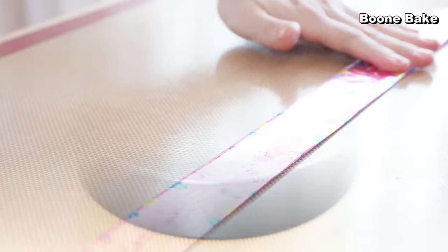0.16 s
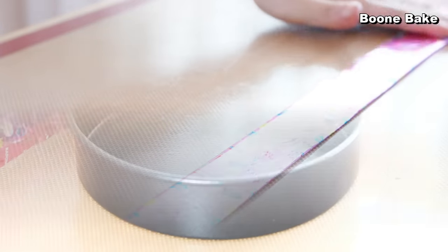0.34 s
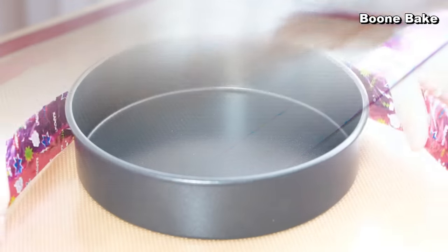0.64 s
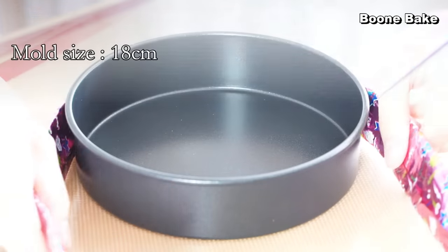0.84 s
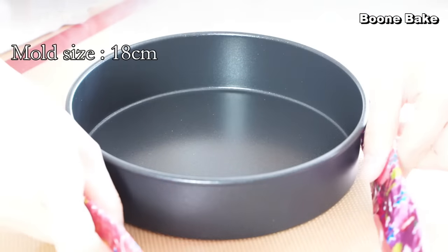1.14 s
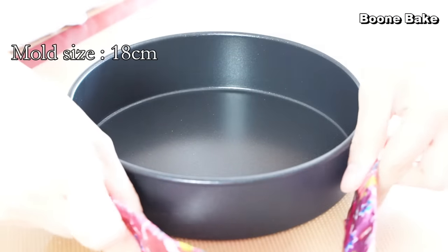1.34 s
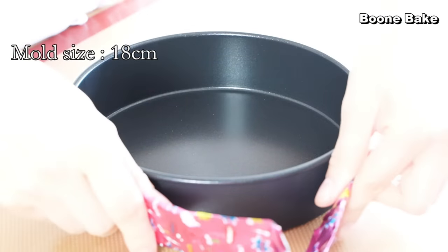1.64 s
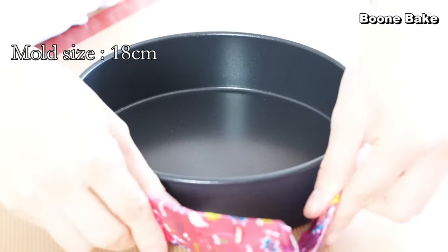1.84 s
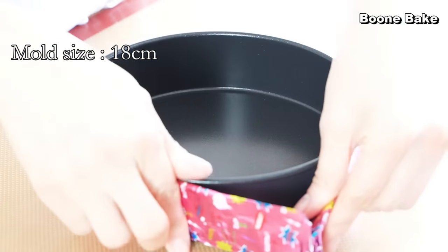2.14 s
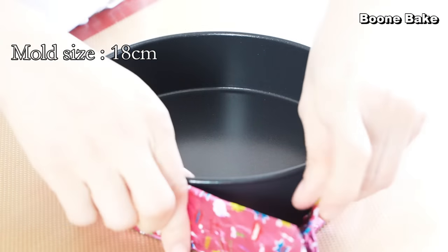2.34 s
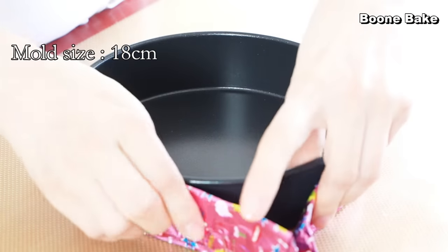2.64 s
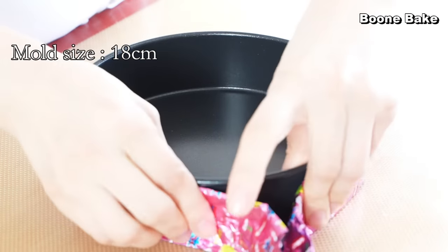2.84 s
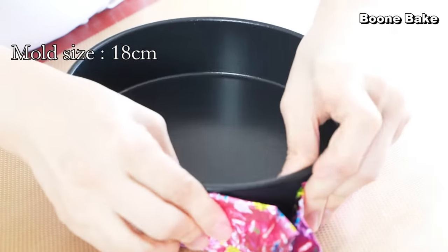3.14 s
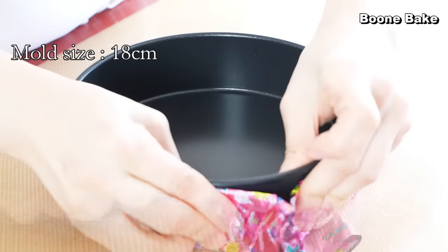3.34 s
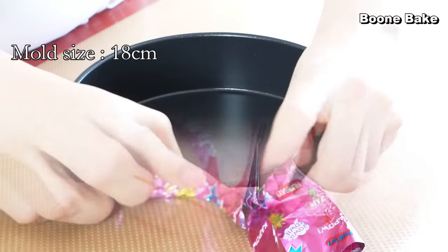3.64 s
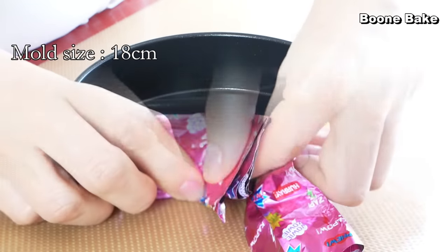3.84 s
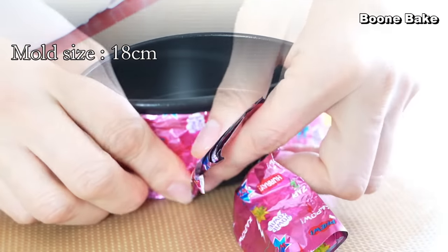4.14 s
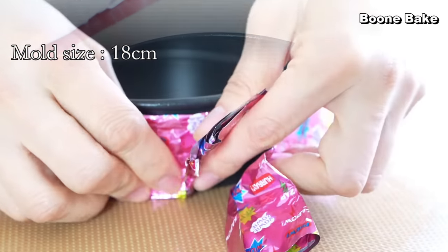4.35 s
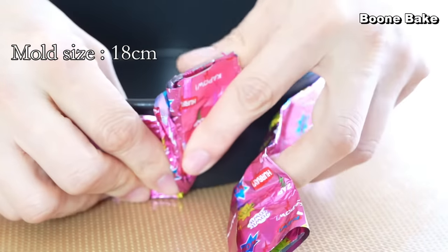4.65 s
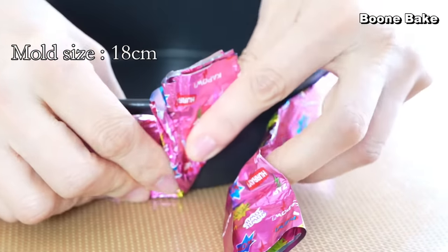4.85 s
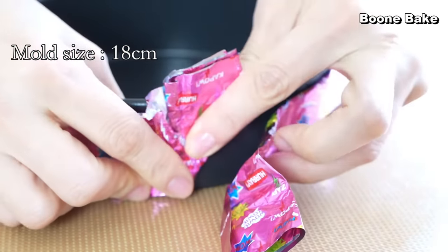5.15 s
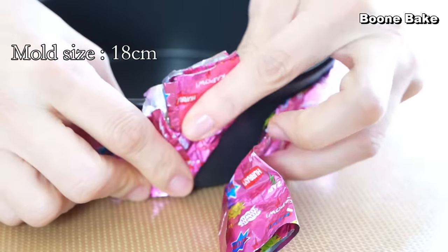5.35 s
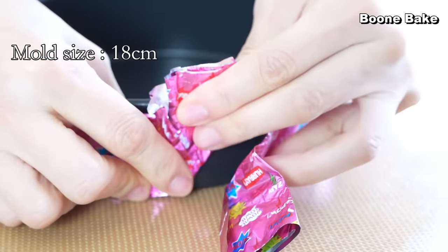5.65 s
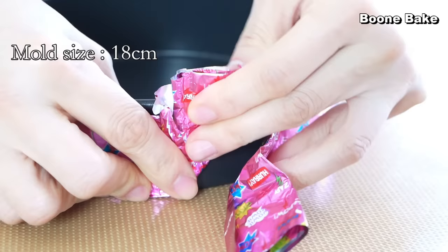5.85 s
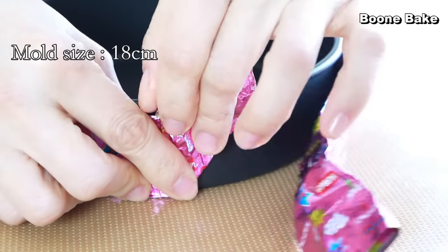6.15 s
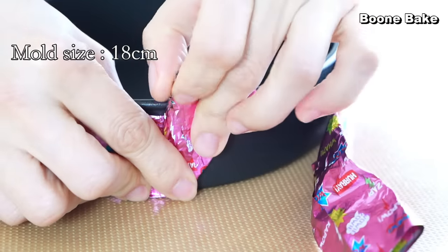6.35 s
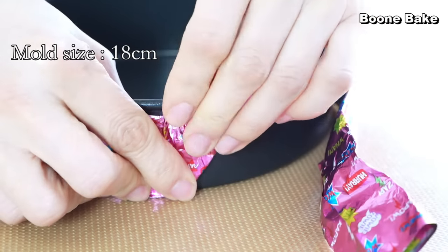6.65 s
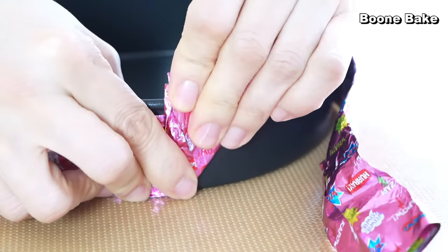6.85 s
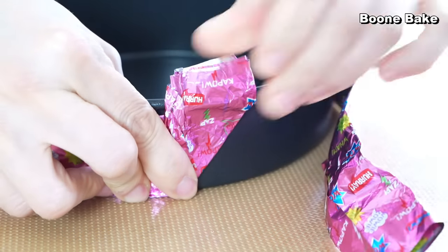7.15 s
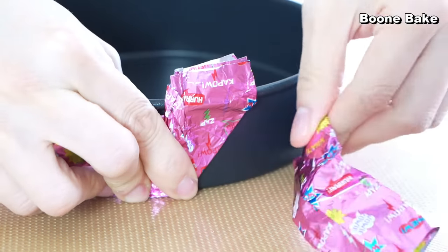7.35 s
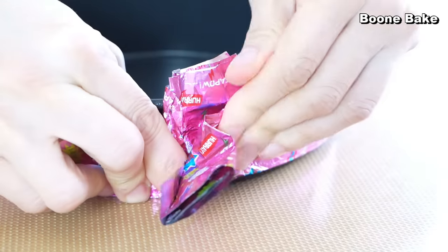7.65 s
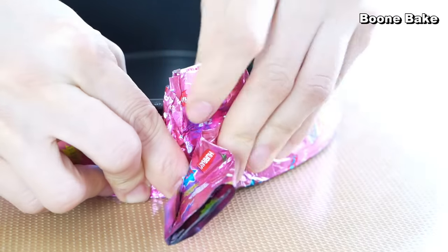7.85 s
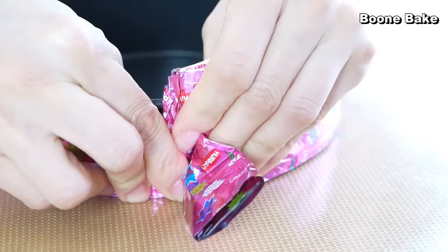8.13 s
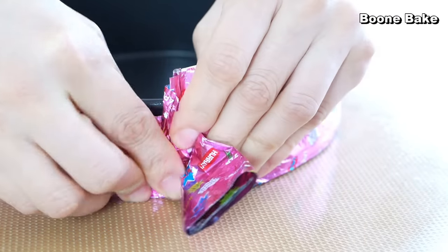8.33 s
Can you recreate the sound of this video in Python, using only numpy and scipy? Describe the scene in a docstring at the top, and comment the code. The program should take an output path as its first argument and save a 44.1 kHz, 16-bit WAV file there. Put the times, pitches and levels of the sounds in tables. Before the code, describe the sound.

Crisp foil handling heard near the microphone: a loud sliding crackle at first, a quieter stretch, then lively creasing and popping as the strip is pulled tight. Quieter pressing and folding ticks follow, with soft thuds on table and pan, a sharp tap around six seconds and bright scraping bursts after seven. Short room reflections and faint low room tone.

```python
"""Metallised foil is smoothed on a table, drawn round a steel baking pan and folded: dense random facet pops over hiss.
Creases tick and panels pop as short noise cracks ringing panel, crease and edge resonances.
Swaying low tones make a deep rumble under the moving arms, and dull noise makes the fingers' rub.
Bumps on pan and table are resonant noise thuds with decaying sine modes for the pan.
A small room answers with a short diffuse tail, over a quiet room tone."""
import sys
import numpy as np
from scipy import signal
from scipy.fft import rfft, irfft, next_fast_len
from scipy.io import wavfile
from scipy.ndimage import uniform_filter1d, map_coordinates

SR = 44100
rng = np.random.default_rng(int(sys.argv[2]) if len(sys.argv) > 2 else 0)


def master_out(mix):
    """Clip the mix to full scale and print it as 16-bit PCM to the path in sys.argv[1]."""
    frames = np.transpose(np.atleast_2d(mix))
    ceiling = np.clip(frames, -1, 1)
    pcm = np.round(ceiling * 32767).astype(np.int16)
    wavfile.write(sys.argv[1], SR, pcm)


N = 374409  # length in samples, about 8.5 s


def amp(db):
    """Decibels to gain."""
    return 10 ** (np.asarray(db) / 20)


def unit(x):
    """Scale to rms 1."""
    return x / np.sqrt(np.mean(x ** 2) + 1e-20)


def along(points, hz):
    """Read (Hz, value) points on a log frequency axis."""
    f, v = np.transpose(points)
    return np.interp(np.log(hz + 1), np.log(f + 1), v)


def curve(rows):
    """Turn (seconds, value) rows into one value per sample."""
    return np.interp(np.arange(N) / SR, *np.transpose(rows))


def wobble(rate):
    """A smooth random curve with rate knots a second."""
    knots = rng.standard_normal(int(N * rate / SR) + 4)
    return map_coordinates(knots, [np.arange(N) * rate / SR])


def add(track, s, sound):
    """Mix a sound into the track at time s in seconds."""
    part = track[max(round(s * SR), 0):][:len(sound)]
    part += sound[:len(part)]


def filtered(x, response):
    """Filter x by a complex response of frequency."""
    m = next_fast_len(len(x) + min(len(x), SR // 2))
    return irfft(rfft(x, m) * response(np.fft.rfftfreq(m, 1 / SR)), m)[:len(x)]


def resonate(x, modes):
    """Pass x through parallel (Hz, width Hz, dB) resonances of alternating sign."""
    def response(f):
        total = 0
        for k, (centre, width, db) in enumerate(modes):
            damping = 1j * f * width
            total = total + (-1) ** k * amp(db) * damping / (centre ** 2 - f * f + damping)
        return total
    return filtered(x, response)


def coloured(x, points, size=1024):
    """Filter x causally to a (Hz, dB) shape, with a minimum-phase kernel of unit energy."""
    shape_db = np.maximum(along(points, np.fft.rfftfreq(size, 1 / SR)), -60)
    cepstrum = irfft(np.log(amp(shape_db)))
    # fold the cepstrum forward in time
    cepstrum[1:size // 2] *= 2
    cepstrum[size // 2 + 1:] = 0
    kernel = irfft(np.exp(rfft(cepstrum)))
    return signal.oaconvolve(x, kernel / np.linalg.norm(kernel))[:N]


def noise(points):
    """Noise of rms 1 with a (Hz, dB) shape."""
    return unit(filtered(rng.standard_normal(N), lambda hz: amp(along(points, hz))))


def burst(t60, size):
    """White noise that starts at full level and falls 60 dB in t60 seconds."""
    return rng.standard_normal(size) * amp(-60 * np.arange(size) / SR / t60)


def swells(rows, attack_s, release_s, size=44100):
    """Gain of (seconds, length, dB) gestures: each grows, holds and dies away; their powers add."""
    power, t = np.zeros(N), np.arange(size) / SR - .2
    for s, length, db in rows:
        away = np.maximum(-t, 0) / attack_s + np.maximum(t - length, 0) / release_s
        add(power, s + t[0], (amp(db) * np.exp(-away)) ** 2)
    return np.sqrt(power)


def crackle(rate, spread_db, slide_db, facet_t60, tone_db=-3, flutter_db=-15, flutter_t60=0.074, count=24):
    """Facets buckle at random moments and strengths, each with its own tiny ring, over the hiss of sliding."""
    pops, t = np.zeros(N), np.arange(256) / SR
    for hz in np.linspace(2200, 14500, count):
        at = rng.integers(0, N, int(rate / count * N / SR))
        strengths_db = spread_db * np.minimum(rng.exponential(size=len(at)), 3.3)
        kicks = np.bincount(at, amp(strengths_db), N)
        ring = np.sin(2 * np.pi * hz * t) * amp(-60 * t / facet_t60)
        crack = burst(facet_t60, len(t)) + amp(flutter_db) * burst(flutter_t60, len(t))
        facet = unit(unit(crack) + amp(tone_db) * unit(ring))
        pops += signal.oaconvolve(kicks, facet)[:N]
    pops = unit(pops) + amp(slide_db) * rng.standard_normal(N)
    # even out the local loudness, so that the gesture levels set it
    power = uniform_filter1d(uniform_filter1d(pops ** 2, size=1400), size=900)
    return pops / np.sqrt(np.abs(power) + 1e-9)


# Colour of tightly folded foil. Each row: frequency in Hz, gain in dB.
FOLDED_COLOUR = [(120, -27), (200, -0.5), (340, -10.5), (480, -5.5), (1080, -4), (3190, -2.5),
                 (11100, -1.5), (13600, 0.5), (16000, -11.5)]


def flexed(grain, rows, attack_s, release_s, body_hz=3200):
    """Tight foil crackles under each gesture; a broad piece has more body than a narrow one."""
    foil = coloured(grain, FOLDED_COLOUR)
    body = filtered(foil, lambda hz: 1 / (1 + (hz / body_hz) ** 4))
    top_rows = [(s, length, db) for s, length, db, breadth in rows]
    body_rows = [(s, length, db + breadth) for s, length, db, breadth in rows]
    top_gain = swells(top_rows, attack_s, release_s)
    body_gain = swells(body_rows, attack_s, release_s)
    return top_gain * (foil - body) + body_gain * body


# Colours of foil lying flat and drawn round the pan. Each row: frequency in Hz, gain in dB.
FLAT_COLOUR = [(120, -17), (200, -27), (440, -13), (600, -10.5), (2960, -6.5), (6760, 1.5), (14100, -7),
               (16000, -17)]
DRAWN_COLOUR = [(120, -26), (200, -23), (749, -13), (1200, -8), (2090, -3), (3620, -5), (6400, -2),
                (7680, -4.5), (9750, 1.5), (11100, -10.5), (13800, -11.5), (16000, -77)]
# Handling stage of the foil. Each row: time in seconds, stage (0 flat, 1 drawn, 2 folded; between = a blend).
STAGE = [(.45, 0), (.75, 0.81), (3.9, 1.085), (4.4, 1.72)]
# Steady sliding. Each row: time in seconds, level in dB before the rustle's trim.
SLIDE_LEVELS = [(0, -25.5), (.05, -31), (.18, -30), (.21, -33), (.34, -32.5), (.455, -36.5), (.51, -43),
                (.54, -34), (.58, -35.5), (.615, -47), (.7, -48.5), (1.08, -44), (1.22, -51.5), (1.26, -43),
                (1.75, -40.5), (2.12, -39), (2.19, -49), (2.38, -40), (2.85, -41.5), (2.97, -49),
                (3.04, -38), (3.54, -40), (3.69, -52.5), (3.86, -46.5), (4.19, -41), (4.3, -51.5),
                (6, -62.5)]
# Tugs that pull the strip tight. Each row: start in seconds, length in seconds, level in dB before the trim.
TUGS = [(1.885, 0.039, -39), (1.966, 0.043, -43), (2.304, 0.01, -40), (2.71, 0.061, -36),
        (3.48, 0.028, -44.5), (3.89, 0.042, -39.5), (4.06, 0.032, -45)]
# Fingers press a fold, a flap scrapes pan wall or mat, the loose flap is grabbed.
# Each row: start in seconds, length in seconds, level in dB before the trim, breadth in dB of extra body.
FOLDS = [(4.341, 0.061, -44, -10), (4.784, 0.045, -47.5, -5), (4.896, 0.017, -43, 3.5),
         (5.204, 0.049, -42.5, 5), (5.287, 0.031, -39, 2.5), (5.468, 0.11, -46.5, 4.5),
         (5.607, 0.15, -54, 4), (5.787, 0.098, -54.5, 0.5), (6.037, 0.22, -49.5, 2.5),
         (6.538, 0.0079, -48.5, 9), (6.623, 0.062, -47.5, -5.5), (6.698, 0.01, -38.5, -15),
         (6.758, 0.086, -47.5, 1), (6.939, 0.014, -49, 5), (7.664, 0.067, -44, -4),
         (7.778, 0.023, -47, 0.5), (7.85, 0.037, -47, 2), (7.965, 0.073, -46, 0), (8.298, 0.16, -45, -1)]
SCRAPES = [(0.33, 0.0087, -32, 0.5), (6.127, 0.015, -35, 4.5), (6.375, 0.0064, -36, -1),
           (7.175, 0.0058, -33.5, 2), (7.341, 0.094, -39.5, -0.5), (7.442, 0.227, -40, -6),
           (7.628, 0.024, -27.5, -2.5), (7.907, 0.031, -34, -7)]
GRABS = [(7.302, 0.0082, -31, 4), (7.344, 0.004, -34, 0)]


def rustle(level_db=-0.57, catch_db=2.0, bend_hz=2400, bend_width_hz=800, bend_db=-3):
    """Sliding foil crackles densely, tugs bend broad panels; folds give fewer, more ringing pops, less hiss."""
    flat = coloured(crackle(rate=1100, spread_db=6.0, slide_db=-2, facet_t60=0.0021), FLAT_COLOUR)
    drawn = coloured(crackle(rate=520, spread_db=5.5, slide_db=-8.5, facet_t60=0.0025), DRAWN_COLOUR)
    pops = crackle(rate=340, spread_db=5.7, slide_db=-16, facet_t60=0.0036, tone_db=0, flutter_db=-19)
    grit = crackle(rate=1800, spread_db=6.0, slide_db=-10.5, facet_t60=0.0051)

    # equal-power blend of the stages
    stage, foil = curve(STAGE), np.zeros(N)
    for k, layer in enumerate((flat, drawn, coloured(pops, FOLDED_COLOUR))):
        foil += np.sqrt(np.clip(1 - np.abs(stage - k), 0, 1)) * layer
    sliding = amp(curve(SLIDE_LEVELS)) * foil

    bent = drawn + resonate(drawn, [(bend_hz, bend_width_hz, bend_db)])
    tugs = swells(TUGS, attack_s=0.01, release_s=0.029) * bent
    folds = flexed(pops, FOLDS, attack_s=0.0036, release_s=0.02)
    scrapes = flexed(grit, SCRAPES, attack_s=0.019, release_s=0.0042)
    grabs = flexed(grit, GRABS, attack_s=0.0017, release_s=0.0048)
    # the foil catches and slips as it moves
    catching = amp(level_db + catch_db * wobble(35))
    return catching * (sliding + tugs + folds + scrapes + grabs)


# Arm movements that sway the table. Each row: start in seconds, length in seconds, level in dB before wobble.
MOVES = [(1.85, 0.27, -50), (2.61, 0.061, -45.5), (3.32, 0.085, -40), (4.85, 0.26, -42.5),
         (5.32, 0.11, -35), (5.53, 0.48, -48.5)]


def handling(foil, sway_hz=26, rest_db=-63, rub_db=-60.0, usual_db=-41, follow=0.38):
    """Moving arms sway the table; fingers rub dully on pan and table, louder the harder they work the foil."""
    phase = 2 * np.pi * np.cumsum(sway_hz * (1 + 0.076 * wobble(21))) / SR
    sway = amp(rest_db) + swells(MOVES, attack_s=0.031, release_s=0.092)
    rumble = sway * amp(4.9 * wobble(27)) * np.sqrt(2) * np.sin(phase)

    # effort is the foil's local level against its usual one
    effort = np.sqrt(np.abs(uniform_filter1d(foil ** 2, size=2200))) / amp(usual_db)
    rub = noise([(50, -6.5), (130, -1), (300, -5.5), (600, -16.0), (1500, -25.0)])
    return rumble + amp(rub_db + 2.4 * wobble(18)) * effort ** follow * rub


# Colour of the room tone. Each row: frequency in Hz, relative level in dB.
HUSH_COLOUR = [(25, 7.5), (150, -8.5), (500, -10), (2000, -15), (8000, -33), (16000, -39)]


def room_tone(level_db=-58.5):
    """The quiet room is steady noise, strongest in the bass."""
    return amp(level_db) * noise(HUSH_COLOUR)


def varied(modes, scatter, spread_db=2.2):
    """No two creases are alike: each (Hz, width Hz, dB) resonance shifts in pitch and strength."""
    shifted = []
    for hz, width, db in modes:
        new_hz = hz * np.exp(scatter * rng.standard_normal())
        shifted.append((new_hz, width, db + spread_db * rng.standard_normal()))
    return shifted


# Resonances of a snap: a crease list, then an edge list.
# Each row: centre in Hz before scatter, width in Hz, gain in dB before scatter.
CREASE_AND_EDGE = [
    [(6340, 1930, -1.5), (9570, 750, 3.5)],
    [(13030, 1400, 0)],
]
# How strongly a snap rings the edge. Each row: stage as in STAGE, edge gain in dB before dulling by breadth.
EDGE_LEVELS = [(0, -13), (1, -20), (2, 1.5)]
# A narrow crease ticks. Each row: time in seconds, crease level in dB over one millisecond.
TICKS = [(0.011, -12), (0.0602, -14.5), (0.0685, -18), (0.078, -17.5), (0.108, -22), (0.133, -19.5),
         (0.445, -22), (0.49, -26.5), (0.7754, -35.5), (1.0628, -30), (1.1088, -32), (1.647, -33),
         (1.963, -20.5), (2.121, -26.5), (2.145, -27), (2.216, -31), (2.2558, -27), (2.267, -26),
         (2.495, -28), (2.622, -26.5), (2.6333, -27), (2.6946, -20.5), (2.768, -24), (2.796, -18.5),
         (2.898, -29), (2.9594, -35), (3.0285, -30), (3.052, -26), (3.2475, -17.5), (3.324, -25.5),
         (3.3558, -17.5), (3.394, -24.5), (3.8515, -33), (4.004, -27.5), (4.04, -19), (4.346, -34),
         (4.381, -34), (4.3997, -35), (4.586, -35), (4.8233, -35), (4.831, -31), (4.896, -35), (5.035, -34),
         (5.132, -35), (5.524, -31.5), (6.002, -36), (6.0173, -25.5), (6.1863, -37), (6.3134, -42),
         (6.5306, -40.5), (6.583, -38), (6.6459, -26), (6.7383, -30.5), (6.808, -35.5), (6.825, -34.5),
         (7.0218, -28), (7.0595, -30), (7.497, -31), (7.8743, -28), (7.9116, -22), (7.929, -20.5),
         (8.004, -30), (8.019, -33), (8.165, -37.5), (8.332, -35), (8.3949, -27)]
# A whole panel pops through.
# Each row: time in seconds, crease level in dB over one millisecond, breadth in dB, panel pitch in Hz.
POPS = [(1.3619, -33, 3.5, 4200), (1.6898, -33, 1, 3200), (1.914, -18, -12, 2380), (2.301, -22.5, -6, 2290),
        (2.5298, -23, 0, 4370), (2.74, -17, -8.5, 4430), (2.8284, -24, -8, 2500), (2.997, -30, 0.5, 4300),
        (3.1354, -28.5, 3.5, 2580), (3.233, -23, -7, 2100), (3.3055, -29, -1, 2410),
        (3.4778, -21, -4, 2170), (3.5044, -12.5, -9.5, 2520), (3.521, -16.5, -11, 2440),
        (3.7335, -29.5, -4, 2470), (4.073, -30, 3.5, 2500), (4.653, -35, -3.5, 4100),
        (5.08, -40.5, 5.5, 1800), (5.1636, -31, 5.5, 3020), (5.209, -37, 1, 3400),
        (5.2487, -27.5, -6.5, 1510), (5.2883, -29.5, -1, 2400), (5.319, -27.5, -2.5, 3270),
        (5.3786, -25.5, -10.5, 1090), (5.423, -34, 2.5, 1540), (5.4302, -26.5, -2, 2720),
        (5.4905, -34.5, -2, 3000), (5.514, -29.5, 0.5, 3190), (5.546, -34, 2, 4460),
        (5.6156, -26, -1, 3880), (5.683, -38, -3, 1640), (5.814, -27.5, -7, 3120),
        (6.0336, -25, -0.5, 1380), (6.1063, -30, -7, 3140), (6.2131, -21, -8, 3190),
        (6.3, -21.5, -9.5, 3100), (6.3827, -33.5, 5, 2540), (6.545, -35.5, 0, 3280),
        (7.3459, -25, -8, 3230), (7.408, -32.5, 7, 2700), (7.64, -26, 2, 2700), (7.709, -35, 3, 2400),
        (8.0498, -21.5, -4, 4200), (8.253, -40.5, 2.5, 1890), (8.3433, -25.5, -6, 4200)]


def snaps(t60=0.003, again_db=-9, gap_s=.003, flutter_db=-28, flutter_t60=0.05, scatter=0.059, dulling=0.25,
          strain_db=-21, strain_t60=0.011, size=1024):
    """A crease flips in two quick cracks ringing panel, crease and edge; breadth favours panel over edge."""
    out, stage = np.zeros(N + size), curve(STAGE)
    tick_breadth_db, tick_hz = -17, 3300  # the little panel beside a narrow crease
    panel_width = 0.37  # as a fraction of its pitch
    ticks = [(s, level, tick_breadth_db, tick_hz) for s, level in TICKS]
    for s, level, breadth, panel_hz in POPS + ticks:
        delay = gap_s * rng.random()
        edge_db = np.interp(stage[round(s * SR)], *np.transpose(EDGE_LEVELS)) - dulling * breadth
        panel = [(panel_hz, panel_width * panel_hz, 0)]
        crease, edge = (varied(part, scatter) for part in CREASE_AND_EDGE)
        for modes, db in ((panel, level + breadth), (crease, level), (edge, level + edge_db)):
            crack = burst(t60, size) + amp(flutter_db) * burst(flutter_t60, size)
            add(crack, delay, amp(again_db) * burst(t60, size))
            # it creaks just before it gives
            strain = amp(strain_db) * burst(strain_t60, size)[::-1]
            crack = np.append(strain, crack)
            main_hz = modes[0][0]
            ring = resonate(resonate(crack, modes), [(main_hz, 2.7 * main_hz, 0)])
            # energy equal to one millisecond at the given level
            add(out, s, amp(db) * unit(ring) * np.sqrt(SR / 1000 / len(ring)))
    return out[size:]  # the strain leads each listed time


# Bumps against the pan and table.
# Each row: time in seconds, thud peak in dB before trim, contact pitch in Hz, pan ring in dB before trim.
KNOCKS = [(0.739, -35.5, 135, -33), (2.397, -35.5, 130, -57), (3.097, -40, 500, -51),
          (4.195, -43.5, 520, -63), (4.905, -45, 163, -54), (5.759, -48, 190, -60), (6.029, -41, 140, -65),
          (6.033, -25.5, 1330, -62), (6.131, -35, 145, -57), (6.133, -18, 2120, -46.5),
          (6.381, -30.5, 614, -59), (6.645, -44, 150, -61), (7.302, -27, 370, -44.5),
          (7.304, -34, 125, -56), (7.638, -27.5, 600, -59), (8.36, -41, 180, -49.5)]
# Modes of the steel pan. Each row: frequency in Hz, relative level in dB, place from 0 (base) to 1 (wall).
PAN_MODES = [(182, -12, 0.15), (279, -5, 0.5), (338, 4.5, 0.41), (814, -7, 0.22), (415.5, -0.5, 0.84),
             (616, -10, 0.9), (1150, -7, 0.85), (2190, -4, 1)]


def knocks(thud_db=-0.5, thud_t60=0.032, width=0.82, ring_db=2, reach_db=3, across_db=-16, wall_hz=260,
           blow_db=-15, base_t60=0.38, wall_t60=0.22, size=22050):
    """Each bump is a thud; low ones come up through the base, higher ones land on the wall and ring its modes."""
    out, t = np.zeros(N), np.arange(size) / SR
    mode_hz, mode_db, place = np.transpose(PAN_MODES)[:, :, None]
    mode_t60 = base_t60 + place * (wall_t60 - base_t60)  # the hands damp the wall
    for s, db, hz, pan_db in KNOCKS:
        life = thud_t60 * np.sqrt(wall_hz / hz)  # hard, high contacts are over sooner than soft, low ones
        push = burst(life, size) * (1 - np.exp(-10 * t / life))
        push[0] += amp(blow_db) * np.sqrt(life * SR)  # the blow itself, ahead of its rattle
        thud = resonate(resonate(push, [(hz, width * hz, 0)]), [(hz, hz, 0)])
        add(out, s, amp(db + thud_db) * thud / np.abs(thud).max())

        # modes far from the contact in pitch or place ring less
        pitch_loss = reach_db * np.abs(np.log2(mode_hz / hz))
        place_gain = across_db * np.abs(place - (hz > wall_hz))
        strength = mode_db - pitch_loss + place_gain + rng.normal(0, 1, place.shape)
        ring = amp(strength - 60 * t / mode_t60) * np.sin(2 * np.pi * mode_hz * t)
        add(out, s, amp(pan_db + ring_db) * ring.sum(0))
    return out


# Decay of the small room. Each row: frequency in Hz, time to fall 60 dB in seconds.
ROOM_DECAY = [(200, 0.29), (2000, 0.33), (7000, 0.23), (15000, 0.27)]


def room(x):
    """A short diffuse tail of noise, each frequency band dying at its own rate."""
    hz, t, z = signal.stft(rng.standard_normal(SR // 2), SR, nperseg=256)
    decay = amp(-60 * t / along(ROOM_DECAY, hz)[:, None])
    tail = signal.istft(z * decay, SR, nperseg=256)[1]
    delayed = np.pad(x, (140, 0))  # about 3 ms
    return signal.oaconvolve(delayed, tail / np.linalg.norm(tail))[:N]


def scene():
    """Foil and pan close by in a quiet room, which the pan stirs more than the foil does."""
    crinkle, pan = rustle(), knocks()
    foil = crinkle + snaps()
    answer = room(amp(-11.5) * foil + amp(-8.0) * pan)
    return (foil + pan + answer + handling(crinkle) + room_tone())[None]


def record(dry, top_hz=16100):
    """A sharp band limit removes everything from top_hz up."""
    return np.array([filtered(channel, lambda hz: hz < top_hz) for channel in dry])


dry = scene()
out = record(dry)
master_out(out)
```